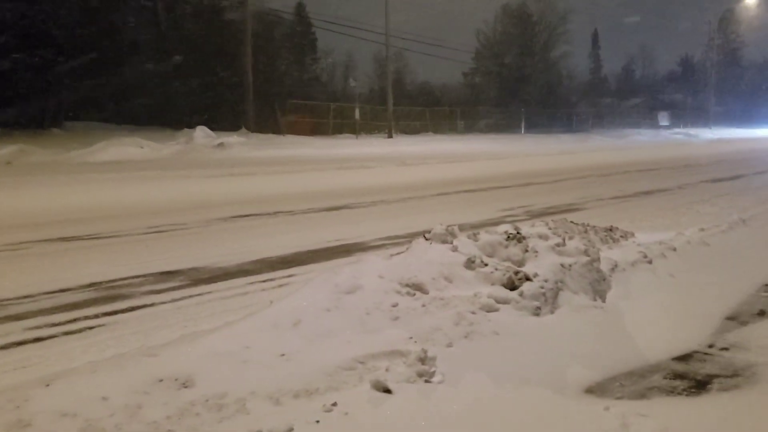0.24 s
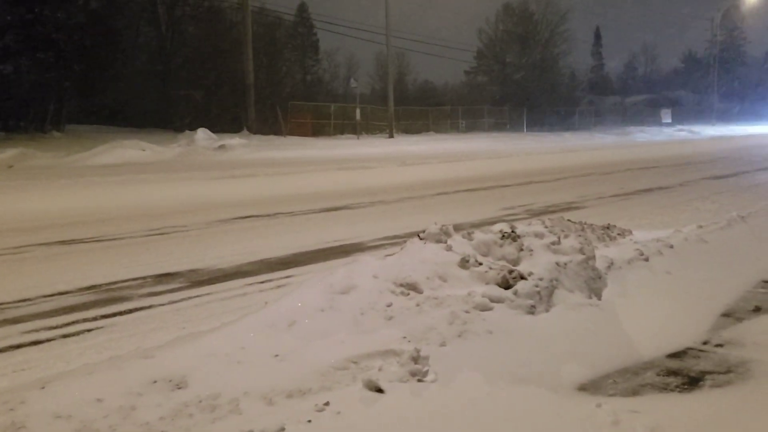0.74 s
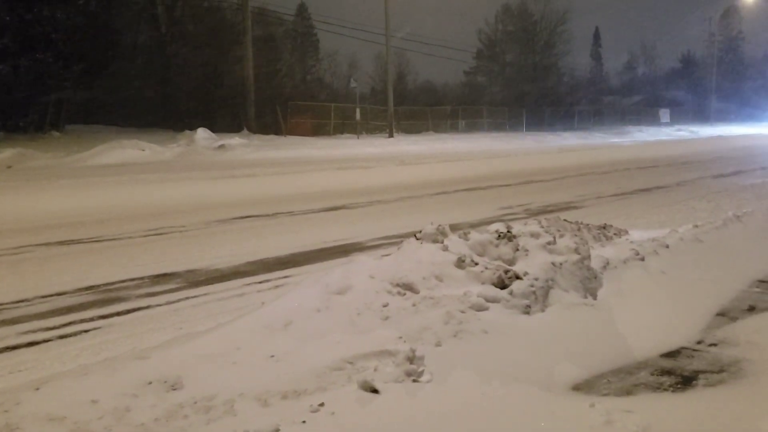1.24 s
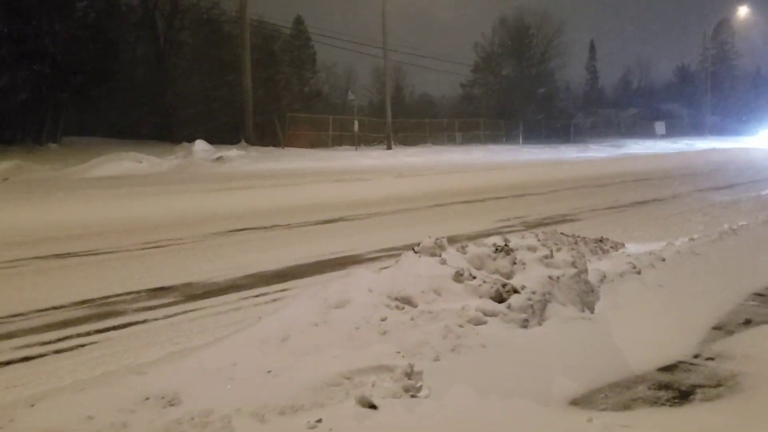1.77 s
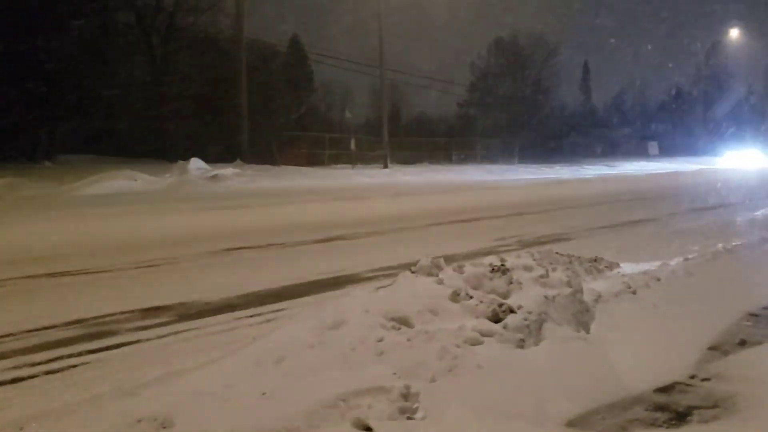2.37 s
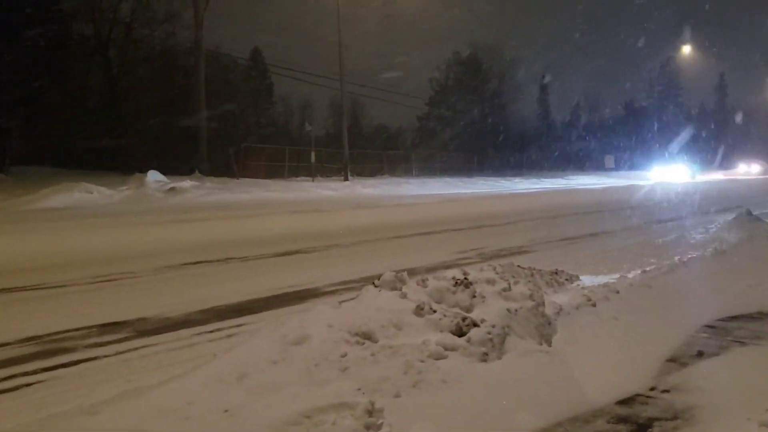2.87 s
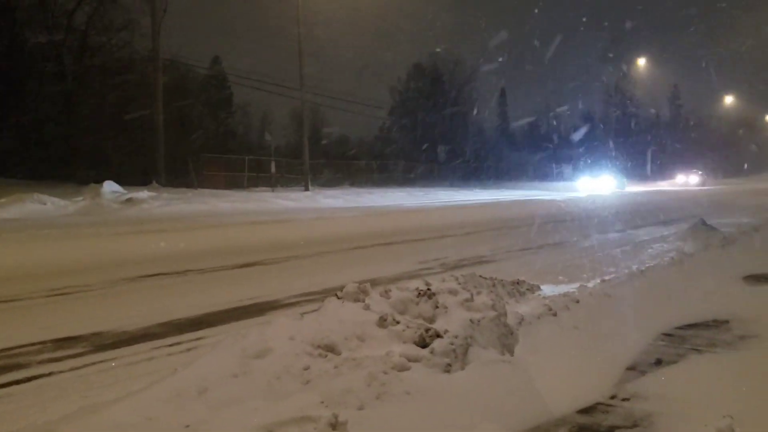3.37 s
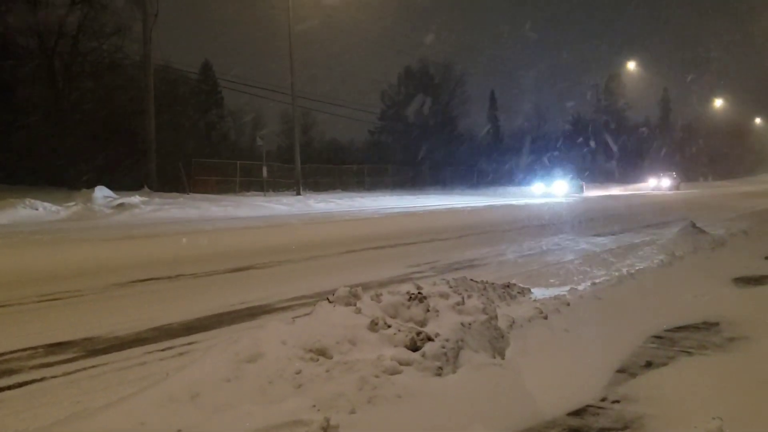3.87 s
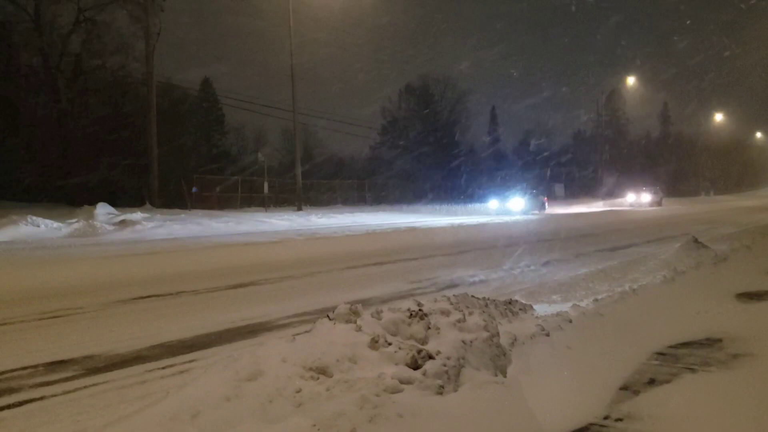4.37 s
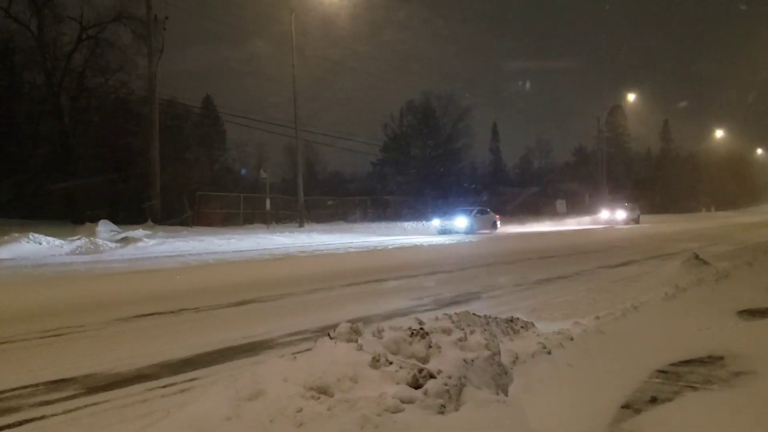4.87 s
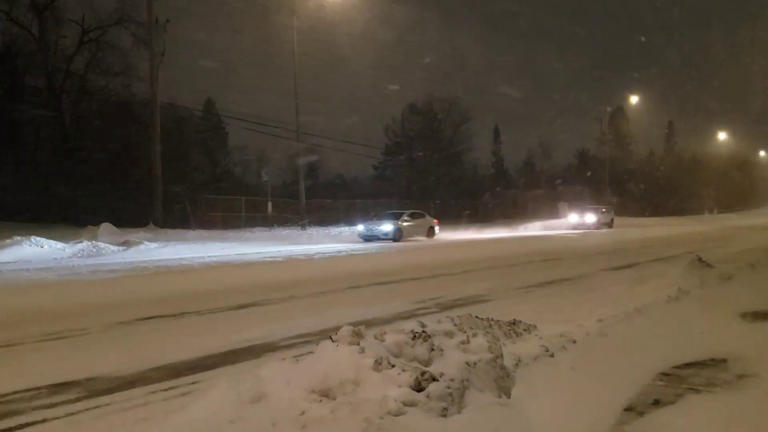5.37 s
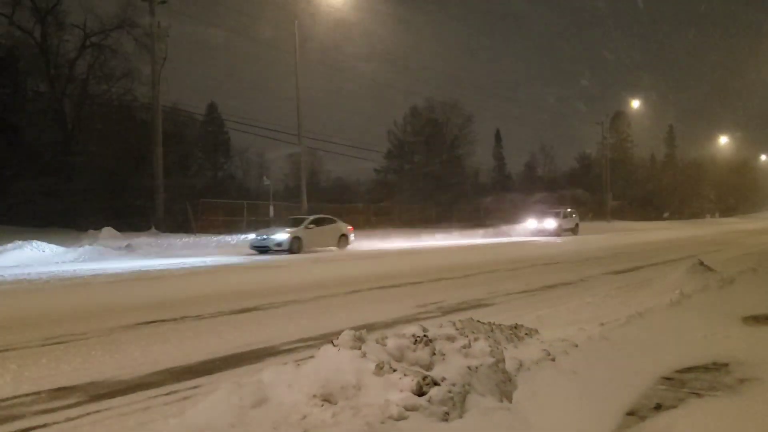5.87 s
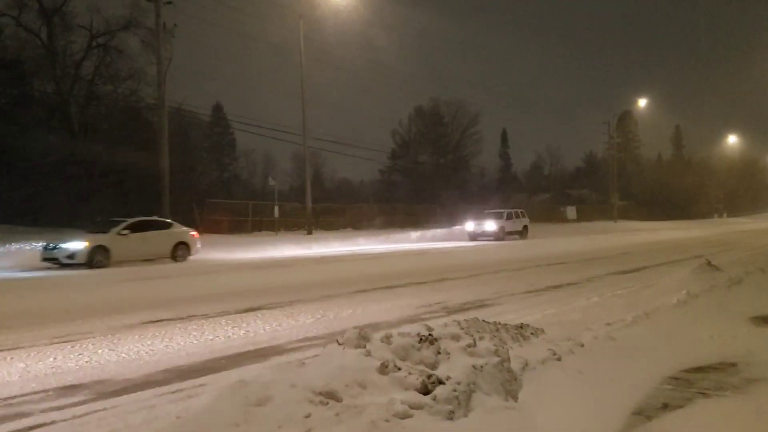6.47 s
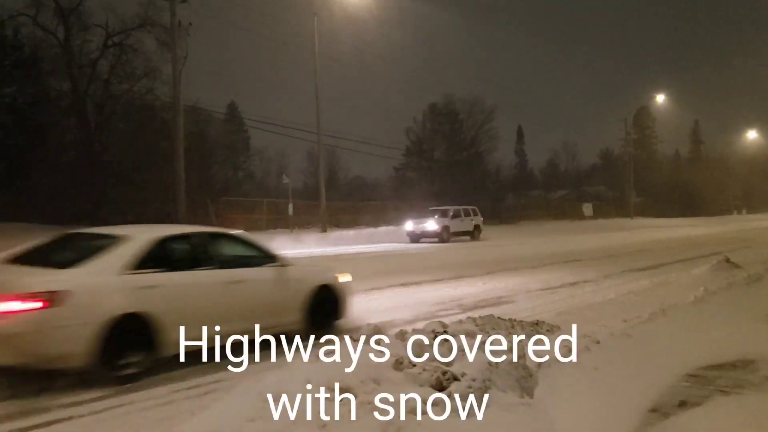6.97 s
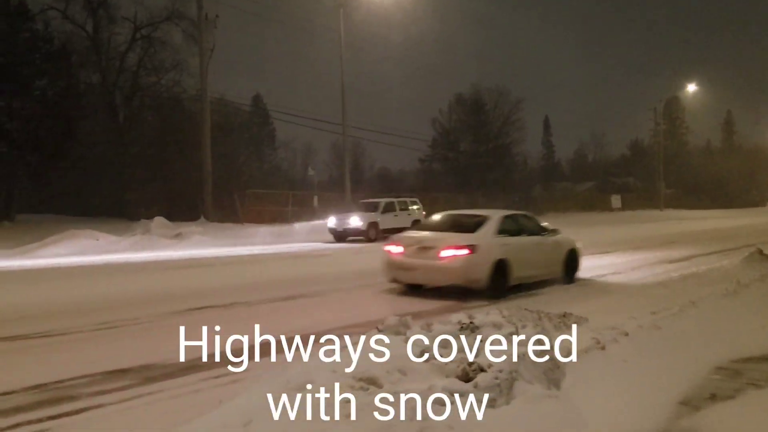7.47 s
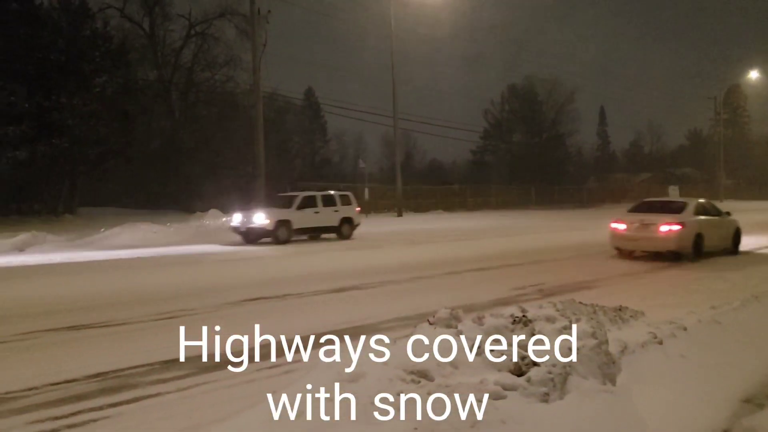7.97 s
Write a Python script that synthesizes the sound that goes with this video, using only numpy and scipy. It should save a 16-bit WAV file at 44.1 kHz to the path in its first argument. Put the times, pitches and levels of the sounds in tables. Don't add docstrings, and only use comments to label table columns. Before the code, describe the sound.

Snowstorm wind buffets a bare phone microphone, thumping and whooshing, with a long hushed lull and a violent gust peaking past six seconds.

```python
import sys
import numpy as np
from scipy import signal
from scipy.io import wavfile

SR = 44100
rng = np.random.default_rng(int(sys.argv[2]) if len(sys.argv) > 2 else 0)


def master_out(mix):
    frames = np.transpose(np.atleast_2d(mix))
    ceiling = np.clip(frames, -1, 1)
    pcm = np.round(ceiling * 32767).astype(np.int16)
    wavfile.write(sys.argv[1], SR, pcm)


def boost(x):
    u = np.asarray(x, float) / 20
    return 10 ** u


N = 362943
STEP = 32
CONTROL_S = np.arange(N // STEP + 2) * STEP / SR
CORNER_HZ = 477

# (time [s], peak [dB], ring [Hz], left minus right [dB])
BURSTS = [(0.092, -39, 390, -15), (0.629, -46, 410, -4), (0.663, -30, 398, 0.5), (1.099, -37.5, 394, 9.5),
          (3.286, -44.5, 327, -1), (3.599, -41, 700, -15), (3.826, -41, 306, -4), (3.847, -40, 236, -2),
          (4.16, -32.5, 316, 9), (4.616, -37, 650, -11), (4.895, -44, 373, 9), (5.275, -46, 370, 11),
          (5.316, -33.5, 578, -3), (5.601, -31.5, 407, -17), (6.056, -26, 240, -2.5), (6.327, -25, 359, 0),
          (6.391, -18, 307, -5), (6.484, -42, 358, -10.5), (6.544, -17.5, 358, -2.5), (6.877, -36, 323, -1),
          (6.947, -22.5, 418, -8), (7.003, -27, 326, -3), (7.104, -17.5, 551, 6), (7.227, -28.5, 365, -2),
          (7.291, -42, 509, 9), (7.415, -41, 510, 21), (7.47, -31.5, 411, 5), (7.816, -40, 420, 19.0),
          (7.854, -36, 448, 17), (7.932, -39, 270, 7)]


def rms_one(x):
    return x / np.sqrt(np.mean(x ** 2) + 1e-20)


def at_hz(points, hz):
    points_hz, points_db = np.transpose(points)
    return np.interp(np.log(hz), np.log(points_hz), points_db)


def drift(rate_hz):
    r = np.exp(-2 * np.pi * rate_hz * STEP / SR)
    chance = rng.standard_normal(len(CONTROL_S) + 1000)
    return rms_one(signal.lfilter([1], [1, -2 * r, r * r], chance)[1000:])


def lumps(spread_db, chance):
    return rms_one(boost(spread_db * chance))


def band_pass(x, low_hz, high_hz):
    return signal.sosfilt(signal.butter(3, [low_hz, high_hz], "band", fs=SR, output="sos"), x)


def spells(rows, column, rise_db_per_s, fade_db_per_s, rest_db):
    rows = np.array(rows)
    start, hold, db = rows[:, :1], rows[:, 1:2], rows[:, column:column + 1]
    early = np.maximum(start - CONTROL_S, 0)
    late = np.maximum(CONTROL_S - start - hold, 0)
    db = db - rise_db_per_s * early - fade_db_per_s * late
    return 10 * np.log10(boost(2 * rest_db) + boost(2 * db).sum(axis=0))


def gusts(thumps, whooshes, duller_db):
    # (time [s], fall [dB per octave])
    dullness = [(0, 10), (.15, 11), (.3, 17), (.7, 24.5), (1.2, 25), (3.2, 13), (3.9, 13), (4.2, 25.5),
                (4.5, 15), (4.7, 9), (5.2, 7.5), (5.5, 6.5), (5.85, 5.5), (6.3, 10), (6.8, 10.5), (7.1, 11),
                (7.6, 16.5), (8.23, 23.5)]
    buffet_db = spells(thumps, 2, rise_db_per_s=454, fade_db_per_s=302, rest_db=-100)
    whoosh_db = spells(whooshes, 2, rise_db_per_s=495, fade_db_per_s=350, rest_db=-100)
    s, fall_db = np.transpose(dullness)
    return buffet_db, whoosh_db, np.interp(CONTROL_S, s, fall_db) + duller_db


def wind_db(gust, hz):
    # (frequency [Hz], density [dB per Hz re band level])
    buffet_shape = [(25, -50), (40, -23.5), (65, -17), (100, -21.5), (160, -27), (230, -31), (400, -39.5)]
    # (frequency [Hz], density [dB per Hz re band level])
    whoosh_shape = [(100, -75), (190, -35), (260, -27.5), (400, -25), (520, -29)]
    bend_db, edge_hz, edge_db_per_oct = 2.5, 2250, 8.5
    buffet_db, whoosh_db, fall_db, lift_oct = gust
    octaves = max(np.log2(hz / CORNER_HZ), 0)
    whoosh = whoosh_db + at_hz(whoosh_shape, hz) - fall_db * octaves
    whoosh = whoosh - bend_db * octaves * (octaves - 1.6)
    whoosh = whoosh - edge_db_per_oct * np.maximum(np.log2(hz / edge_hz) - lift_oct, 0)
    buffet = buffet_db + at_hz(buffet_shape, hz) - 18 * octaves
    return 10 * np.log10(boost(2 * whoosh) + boost(2 * buffet))


def port(gust, rise_db, calm, jolt_db, hiss_from_hz, blast_db):
    rustle_db, sizzle_db = rise_db
    buffet_db, whoosh_db, fall_db = gust
    blast = np.clip(rustle_db - blast_db, 0, 30)
    gust = buffet_db, whoosh_db, fall_db - 0.1393 * blast, 0.5 * blast
    eddies = 0.65 * drift(9.1) + 1.11 * drift(35.7)
    sleet = drift(23.6)
    edges = 8800 * 2 ** (np.arange(-26, 4) / 3)
    white = rng.standard_normal((2, N)) * np.sqrt(SR / 2)
    out = np.zeros(N)
    for k, (low, high) in enumerate(zip(edges, edges[1:])):
        hz = np.sqrt(low * high)
        own = drift(np.clip(hz / 12, 6, 45))
        spread_db = 2.77 * np.clip(1 - 0.075 * np.log2(hz / CORNER_HZ), .5, 1)
        wind = boost(wind_db(gust, hz) + jolt_db) * lumps(spread_db, eddies + 0.83 * own)

        share = np.clip(np.log2(hz / hiss_from_hz), 0, 1)
        rise = sizzle_db if low > 8700 else rustle_db * share
        rise = rise - 0.33 * np.clip(rise - blast_db, 0, 30) * (6900 < low < 8700)
        flicker_db = 0.49 + 1.0 * (hz < 800) + 0.14 * np.clip(rise, 0, 20)
        rest_db = at_hz(calm, hz) + rise + jolt_db * (rise > 8)
        rest = boost(rest_db + flicker_db * (sleet + 0.3 * own))
        gain = np.interp(np.arange(N) / STEP, np.arange(len(own)), np.hypot(wind, rest))
        out += gain * band_pass(white[k % 2], low, high)
    return out


def ticks(rows, body_db):
    strikes = np.zeros(N)
    strikes[[round(s * SR) for s, db in rows]] = boost(np.array(rows)[:, 1] + 9.0)
    fade = np.exp(-1 / (0.001 * SR))
    spit = signal.lfilter([1], [1, -fade], strikes + 1e-18) * rng.standard_normal(N)
    return band_pass(spit, 9400, 12900) + boost(body_db) * band_pass(spit, 2200, 6300)


def snow(flurries, rest, drift_db, duck_db):
    lull_start_s, lull_end_s, lull_edge_s = 0.92, 3.02, 0.26
    outside_s = np.maximum(lull_start_s - CONTROL_S, CONTROL_S - lull_end_s)
    drifting = np.clip(outside_s / lull_edge_s, 0, 1)
    duck = duck_db * np.clip((CONTROL_S - 6.92) * 10, 0, 1)
    floors = rest[0] + drift_db * drifting - duck, rest[1] - duck
    return [spells(flurries, 2 + k, 365, 250, floors[k]) - rest[k] for k in range(2)]


def jolts(sign, dip_db, kick_db):
    out = 0
    for s, db, hz, pan_db in BURSTS:
        share = np.clip(1.5 + sign * pan_db / 8, 0, 1)
        away_s = abs(CONTROL_S - s)
        stall, surge = -dip_db * np.exp(-away_s / 0.012), kick_db * np.exp(-away_s / 0.016)
        out = out + share * np.where(CONTROL_S < s, stall, surge)
    return out


def pops():
    out = np.zeros((2, N))
    t = np.arange(round(.04 * SR)) / SR
    swell = (t / 0.0032) * np.exp(1 - t / 0.004)
    for (s, db, hz, pan_db), turn in zip(BURSTS, rng.random((len(BURSTS), 2))):
        at = round(s * SR)
        for side, sign in enumerate([1, -1]):
            ring = swell * np.sin(2 * np.pi * (hz * t + turn[side]))
            level = boost(db - 1.0 + min(sign * pan_db, 0))
            out[side, at:at + len(t)] += (level * ring)[:N - at]
    return out


def far():
    # (start [s], end [s], low edge [Hz], high edge [Hz], left level [dB], right level [dB])
    distant = [
        (1.93, 2.11, 3800, 4600, -70.5, -78),
        (4.66, 6.3, 660, 1870, -59.5, -74),
        (4.2, 5.54, 290, 676, -59, -69),
        (1.54, 1.66, 26, 410, -74, -60.5),
        (3.8, 7.36, 10800, 12300, -78, -71),
    ]
    out, t = np.zeros((2, N)), np.arange(N) / SR
    for start, end, low_hz, high_hz, left_db, right_db in distant:
        arc = np.sin(np.pi * np.clip((t - start) / (end - start), 0, 1))
        swell = np.abs(arc) ** 0.76 * (t < end) * (t > start)
        noise = band_pass(rng.standard_normal((2, N)), low_hz, high_hz)
        noise = rms_one(band_pass(noise, low_hz, high_hz))
        out += boost(np.array([[left_db], [right_db]])) * swell * noise
    return out


def scene():
    # (start [s], hold [s], level [dB])
    thumps_left = [(0.04, 0.13, -38), (0.26, 0.01, -56), (0.37, 0.018, -53), (0.66, 0.012, -46),
                   (0.85, 0.063, -74), (1.09, 0.02, -72), (3.28, 0.058, -43.5), (3.44, 0.022, -45.5),
                   (3.55, 0.22, -48.5), (3.83, 0.26, -51), (4.11, 0.042, -57), (4.32, 0.096, -51),
                   (4.45, 0.18, -51.5), (4.66, 0.11, -44), (5.15, 0.036, -73), (5.3, 0.19, -39),
                   (5.47, 0.074, -40.5), (5.6, 0.039, -40), (5.7, 0.69, -39), (6.18, 0.12, -31),
                   (6.41, 0.157, -29.5), (6.59, 0.04, -33), (6.7, 0.2, -26.5), (7.01, 0.11, -28.5),
                   (7.24, 0.0082, -47), (7.41, 0.1, -74), (7.62, 0.059, -60), (7.8, 0.1, -71),
                   (7.93, 0.09, -66), (8.14, 0.02, -51.5)]
    thumps_right = [(0.02, 0.24, -42.5), (0.36, 0.032, -46.5), (0.53, 0.039, -59), (0.65, 0.23, -51),
                    (1.09, 0.12, -56.5), (3.27, 0.21, -46), (3.57, 0.1, -51), (3.71, 0.02, -48),
                    (3.81, 0.26, -45.5), (4.11, 0.14, -48.5), (4.27, 0.12, -48), (4.48, 0.068, -50),
                    (4.68, 0.14, -48.5), (4.95, 0.22, -70.5), (5.29, 0.038, -45), (5.4, 0.18, -37.5),
                    (5.65, 0.084, -38), (5.78, 0.046, -37.5), (5.94, 0.08, -38), (6.08, 0.042, -33),
                    (6.17, 0.046, -31.5), (6.25, 0.046, -28), (6.38, 0.037, -23), (6.47, 0.1, -30),
                    (6.6, 0.35, -32), (7.0, 0.067, -24.5), (7.04, 0.22, -35), (7.38, 0.33, -47.5),
                    (7.85, 0.18, -47), (8.1, 0.11, -47.5)]
    # (start [s], hold [s], level [dB])
    whooshes_left = [(-0.005, 0.29, -48), (0.363, 0.015, -41.5), (0.527, .02, -55), (0.659, 0.012, -42),
                     (0.735, 0.012, -49), (1.088, 0.016, -39.5), (3.27, 0.58, -55.5), (3.817, 0.36, -50.5),
                     (4.147, .01, -43.5), (4.317, 0.22, -52.5), (4.574, 0.16, -46), (4.894, 0.012, -63),
                     (5.297, 0.066, -43), (5.4, 0.12, -41), (5.611, 0.093, -42.5), (5.75, 0.26, -40.5),
                     (5.975, .2, -38), (6.19, 0.11, -28.5), (6.381, 0.093, -29.5), (6.523, 0.12, -27),
                     (6.676, 0.057, -34), (6.775, 0.15, -30), (6.973, 0.03, -34.5), (7.043, 0.058, -27),
                     (7.146, .14, -38.5), (7.404, 0.012, -38.5), (7.474, 0.032, -39), (7.557, 0.19, -52),
                     (7.824, 0.18, -46.5), (8.12, .07, -50)]
    whooshes_right = [(.02, 0.15, -41), (0.179, 0.14, -52.5), (.35, .025, -46.5), (0.631, 0.029, -47),
                      (1.1, .08, -56), (3.26, .11, -51), (3.429, .06, -62.5), (3.55, 0.068, -50),
                      (3.601, 0.062, -45.5), (3.82, 0.087, -46), (3.95, .24, -53.5), (4.4, .17, -50),
                      (4.588, .14, -43), (5.29, 0.15, -40.5), (5.45, .05, -33.5), (5.598, .24, -36.5),
                      (5.86, 0.07, -39), (5.978, .18, -35), (6.182, 0.15, -28), (6.399, 0.032, -24),
                      (6.48, 0.031, -32.5), (6.538, 0.063, -25.5), (6.66, .26, -28.5), (6.97, .17, -28.5),
                      (7.228, 0.0052, -33.5), (7.44, 0.065, -40), (7.66, 0.076, -58.5), (7.86, .02, -56),
                      (7.93, .05, -45.5), (8.1, .2, -49.5)]
    # (frequency [Hz], density [dB per Hz])
    calm_left = [(30, -111.3), (65, -104.0), (120, -104.3), (200, -112.3), (330, -94), (480, -92),
                 (800, -106.0), (1500, -108.3), (2300, -113.0), (3500, -107.8), (6000, -107.8),
                 (8000, -108.4), (9500, -103.2), (15000, -102.2)]
    calm_right = [(30, -101.3), (65, -92), (120, -99.7), (200, -108.8), (330, -106.9), (480, -104.0),
                  (800, -109.4), (1500, -113.4), (2300, -116.1), (3500, -119.3), (6000, -126.9),
                  (8000, -131.3), (9500, -123.2), (15000, -115.0)]
    # (time [s], peak [dB])
    grains_left = [(0.003, -40.5), (0.031, -40), (0.042, -46), (0.174, -48), (0.233, -45), (0.292, -42.5),
                   (0.554, -45.5), (0.869, -49), (1.177, -57), (3.37, -45), (3.664, -46), (3.881, -50),
                   (4.005, -47), (5.413, -46.5), (5.446, -44), (5.673, -47), (5.987, -46), (6.253, -37.5),
                   (6.422, -33), (6.711, -45), (6.765, -36)]
    grains_right = [(0.046, -42), (0.058, -47), (0.234, -46), (0.285, -43.5), (0.405, -47), (3.37, -48),
                    (3.572, -51), (3.594, -50), (3.879, -62), (5.628, -55), (5.655, -50), (5.675, -55),
                    (5.885, -46.5), (6.435, -37), (6.491, -45.5), (6.558, -38), (6.715, -50), (6.768, -38),
                    (6.89, -42)]
    # (start [s], hold [s], rustle [dB], sizzle [dB])
    flurries_left = [(.035, 0.024, -73, -59), (.23, 0.096, -78, -62), (3.28, 0.23, -81, -65),
                     (3.77, .95, -69, -64), (5.19, 0.21, -69, -64), (5.65, .02, -80, -56),
                     (5.88, .02, -80, -57.5), (6.14, 0.13, -73, -58), (6.42, 0.0079, -53, -50.5),
                     (6.51, 0.097, -64, -54), (6.7, 0.13, -64, -58), (6.88, 0.0093, -62, -64),
                     (6.99, 0.29, -69.5, -71)]
    flurries_right = [(0.02, 0.054, -67.5, -56), (0.17, 0.07, -78, -60), (0.27, 0.01, -67.5, -57),
                      (0.36, 0.079, -81, -61.5), (0.54, 0.03, -87, -65), (3.31, 0.07, -80, -65),
                      (3.57, 0.1, -80.5, -65), (3.96, 0.15, -77.5, -67), (4.29, 0.38, -84, -73),
                      (5.34, 0.036, -86, -74), (5.45, 0.14, -77, -69), (5.66, 0.027, -86, -53.5),
                      (5.7, 0.1, -76, -61), (5.82, 0.19, -72.5, -68), (6.13, 0.14, -57.5, -60),
                      (6.42, 0.01, -50.5, -53), (6.5, 0.14, -55, -56.5), (6.71, 0.12, -56.5, -57),
                      (6.87, 0.018, -60.5, -65.5), (7.01, 0.1, -69, -73), (7.23, 0.01, -81, -78),
                      (7.31, 0.03, -87, -71)]

    left = port(gusts(thumps_left, whooshes_left, duller_db=-1.08),
                snow(flurries_left, rest=(-71.5, -63.5), drift_db=6.5, duck_db=1.5),
                calm_left, jolts(0.88, dip_db=14.5, kick_db=5.5), hiss_from_hz=3220, blast_db=17)
    right = port(gusts(thumps_right, whooshes_right, duller_db=2.06),
                 snow(flurries_right, rest=(-88, -77.5), drift_db=-2.3, duck_db=-0.5),
                 calm_right, jolts(-2.2, dip_db=5, kick_db=4.0), hiss_from_hz=1280, blast_db=9.5)
    grains = [ticks(grains_left, body_db=-8.5), ticks(grains_right, body_db=-9.5)]
    return np.array([left, right]) + grains + pops() + far()


def top_cut(x):
    return signal.sosfilt(signal.butter(12, 16330, fs=SR, output="sos"), x)


def record(dry):
    mix = signal.sosfilt(signal.cheby2(24, 60, 15950, fs=SR, output="sos"), dry)
    return top_cut(mix)


dry = scene()
out = record(dry)
master_out(out)
```